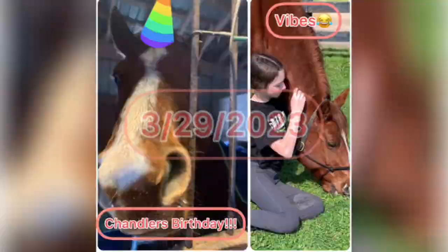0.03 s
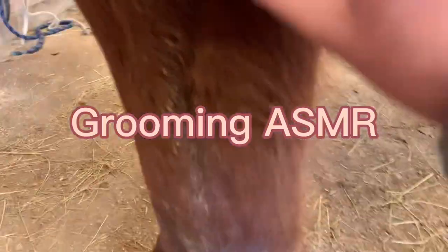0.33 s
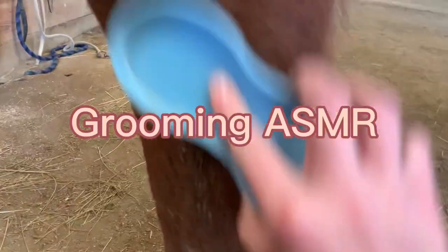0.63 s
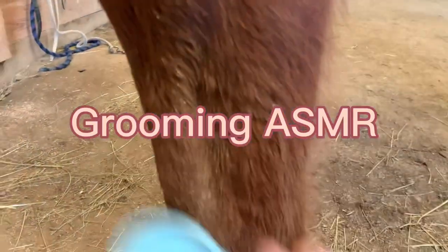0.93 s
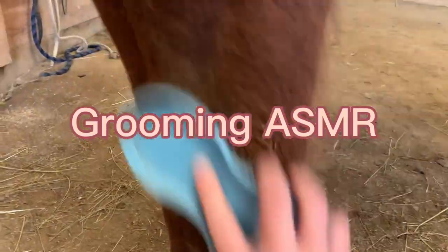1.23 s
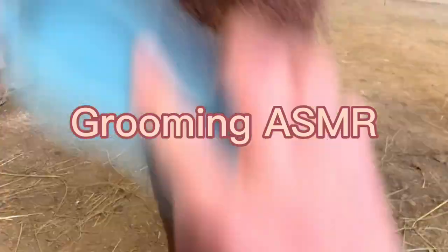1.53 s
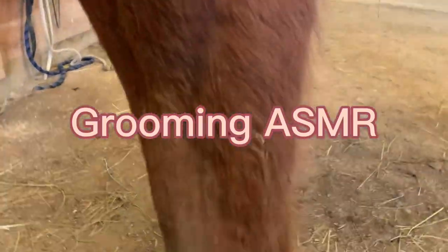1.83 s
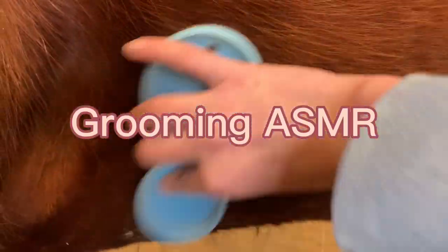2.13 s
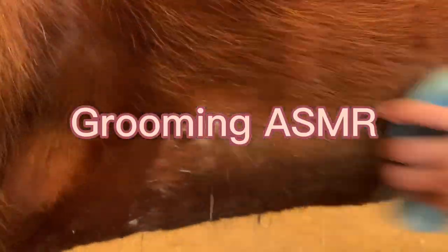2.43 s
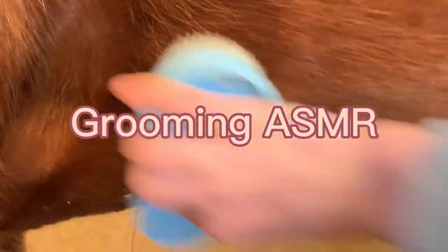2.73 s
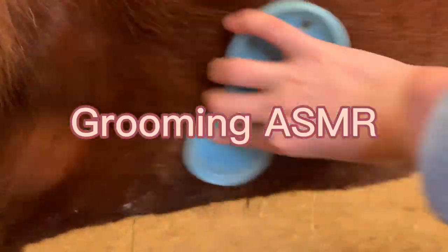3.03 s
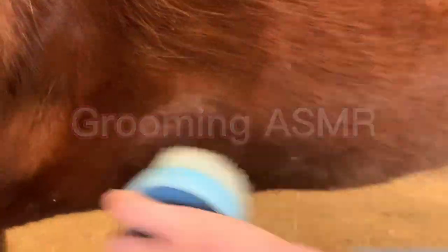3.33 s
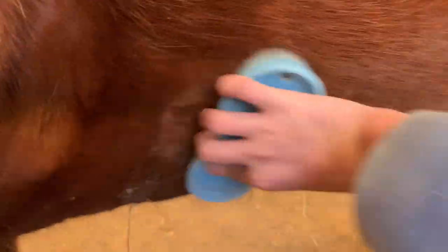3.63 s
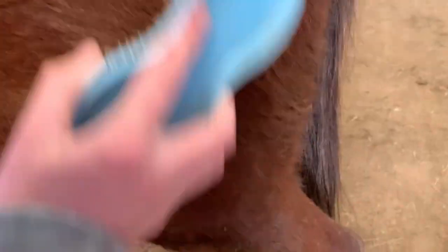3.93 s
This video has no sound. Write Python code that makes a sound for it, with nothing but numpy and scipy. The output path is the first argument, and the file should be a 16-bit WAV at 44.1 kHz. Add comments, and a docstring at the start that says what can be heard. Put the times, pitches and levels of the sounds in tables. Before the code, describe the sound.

A plastic bristle brush strokes a horse's coat: three scratchy swishes down a leg with soft thuds and ticks, then three slightly fuller ones on the flank. Heard from close by in a stable, over a low rumble.

```python
"""A plastic bristle brush sweeps a horse's coat in a stable: three strokes down a leg, three on the flank.
Friction excites countless flicks of bristle on hair, which superpose into a bright swish; hard
rubbing adds rasp and sizzle. Light impacts tick and thud, and the arm rustles between strokes.
A low rumble and a dull wash of air lie underneath. Two microphones hear it all from close by."""
import sys
import numpy as np
from scipy import signal
from scipy.fft import rfft, irfft
from scipy.io import wavfile
from scipy.ndimage import uniform_filter1d

SR = 44100
rng = np.random.default_rng(int(sys.argv[2]) if len(sys.argv) > 2 else 0)


def wrap_up_sound(samples):
    """Save the sound to the file named by the first command line argument, as 16-bit audio."""
    columns = np.atleast_2d(samples).T
    # keep every value between -1 and 1, then stretch to whole-number steps
    tamed = np.clip(columns, -1, 1)
    steps = np.round(tamed * 32767).astype(np.int16)
    wavfile.write(sys.argv[1], SR, steps)


N = 176400
TIME = np.arange(N) / SR

# Rubbing envelopes, one per stroke: t/s, level/dB
LEG_STROKES = [
    [(0.32, -66.5), (0.372, -48.5), (0.602, -39.5), (0.654, -33.5), (0.742, -39.5), (0.812, -37.5),
     (0.868, -45.5), (0.93, -74)],
    [(1.07, -71.5), (1.126, -39.5), (1.208, -34.5), (1.268, -39), (1.32, -37), (1.33, -37), (1.348, -62),
     (1.39, -75)],
    [(1.6, -75), (1.638, -44.5), (1.652, -41.5), (1.726, -36), (1.84, -41), (1.86, -64.5), (1.89, -65)],
]
# Bristles biting early in each stroke: centre t/s, half-width/s, level/dB
RASPS = [(.42, 0.17, -50), (.595, 0.084, -40), (1.155, 0.077, -39.5), (1.672, 0.061, -40)]
# Spectral densities of swish and rasp: f/Hz, relative level/dB
LEG_SPECTRUM = [(280,0), (480,-15.5), (1650,-10), (2000,-11.5), (2480,-5), (3050,-15.5), (3550,-10.5),
                (3950,-6), (5200,-9.5), (6200,-4.5), (8000,-1), (10000,-5), (15500,-4.5)]
RASP_SPECTRUM = [(600, -23.5), (1300, -21), (1800, -4.5), (2050, -11.5), (2550, 4), (3150, -3),
                 (3800, -0.5), (4700, -4.5), (5600, -7), (9000, -15), (16000, -26)]
# Stereo field at the leg: f/Hz, coherence (0-1), left phase lead/rad, left-right level/dB
LEG_STEREO = [(200,0.92,-1,2.5), (700,0.65,-0.76,-2), (1620,0.3,0,-6.5), (2860,.58,-2.8,0.5),
              (3250,0.8,0.5,-0.8), (4560,0,-4.5,6.5), (5600,0.3,-3.5,4), (6500,0,-2.1,1), (7700,1,-1.5,-2),
              (9700,0.73,-0.6,1)]
def leg_strokes(friction, swish_db=0.94, full_bite_db=-47):
    """Sliding friction: a thin swish follows the rubbing, with a rasp where the bristles bite."""
    rub = sum(map(envelope, LEG_STROKES))
    bite = np.minimum(rub / amp(full_bite_db), 1)
    swish = amp(swish_db) * rub * stereo(friction, LEG_SPECTRUM, LEG_STEREO)
    rasp = bite * swells(RASPS) * stereo(bristles(), RASP_SPECTRUM, LEG_STEREO)
    return swish + rasp


# Rubbing envelopes, one per stroke: t/s, level/dB
FLANK_STROKES = [
    [(2.19, -63), (2.216, -59.5), (2.274, -40.5), (2.352, -34), (2.428, -38.5), (2.458, -44.5),
     (2.48, -58.5), (2.53, -77)],
    [(2.85, -72), (2.948, -38), (3.104, -36), (3.196, -48.5), (3.222, -49), (3.242, -69), (3.27, -76.5)],
    [(3.45, -78), (3.562, -43.5), (3.676, -35), (3.768, -40), (3.806, -46), (3.82, -59), (3.852, -59.5),
     (3.86, -64)],
]
# Spectral density of the swish: f/Hz, relative level/dB
FLANK_SPECTRUM = [(250,-11), (500,-18.5), (1300,-11.5), (1550,-10.5), (1900,-4), (2450,-2.5), (2950,-7),
                  (3350,-4), (4600,-8), (6500,-2.5), (7400,-4.5), (8400,-1.5), (10000,-4.5), (15500,-6.5)]
# Low-treble boost or cut, one per stroke: level/dB
FLANK_BODY = [1, 2.5, -1]
# Stereo field at the flank: f/Hz, coherence (0-1), left phase lead/rad, left-right level/dB
FLANK_STEREO = [(200,0.7,0.7,3), (726,1,-0.75,-4), (1680,0.24,-4,-3.5), (2700,0.41,-2,-1),
                (3540,0.51,-2.5,1.5), (4900,0.45,-.5,6.5), (5540,0.8,-3,2), (6600,0.3,-2.5,2.5),
                (7440,1,-1.5,-1), (9700,0.64,-1,1)]
def flank_strokes(friction, swish_db=1.5, body_hz=2100, body_octaves=0.65):
    """Source and filter: friction noise takes a fuller spectrum on the flank, varied for each stroke."""
    hz, db = np.transpose(FLANK_SPECTRUM)
    body = np.exp(-(np.log2(hz / body_hz) / body_octaves) ** 2)
    out = np.zeros((2, N))
    for stroke, body_db in zip(FLANK_STROKES, FLANK_BODY):
        spectrum = np.column_stack([hz, db + body_db * body])
        out += envelope(stroke) * stereo(friction, spectrum, FLANK_STEREO)
    return amp(swish_db) * out


def bristles(flicks_per_s=12000, spread_db=2.8, chatter_db=0.69, chatter_hz=70):
    """Shot noise: random flicks of bristle tips add to the hiss of sliding hair at equal power."""
    sizes = amp(spread_db * np.minimum(rng.exponential(1, (2, N)), 5))
    signs = rng.choice([-1, 1], (2, N))
    flicks = sizes * signs * (rng.random((2, N)) < flicks_per_s / SR)
    hiss = rng.standard_normal((2, N))
    friction = np.sqrt(0.5) * (unit_rms(flicks) + hiss)
    return tufts(friction) * amp(chatter_db * wander(chatter_hz))


# Depth of the shifting resonances: f/Hz, rms level swing/dB
TUFT_DEPTH = [(800, 1.8), (2500, 3.0), (8000, 1.8), (15000, 1.4)]
def tufts(pair, frame=1024):
    """Random amplitude modulation: narrow bands swell and fade as different tufts take hold."""
    hz, _, bands = signal.stft(pair, SR, nperseg=frame)
    patches = uniform_filter1d(rng.standard_normal(bands.shape[1:]), size=5, axis=0)  # over frequency
    patches = uniform_filter1d(patches, size=12, axis=1)  # over time
    depth_db = at_frequencies(TUFT_DEPTH, hz)[0][:, None]
    return signal.istft(bands * amp(depth_db * unit_rms(patches)), nperseg=frame)[1][:, :N]


# Spectral density of the sizzle: f/Hz, relative level/dB
SIZZLE_SPECTRUM = [(3000, -29), (7000, -7), (11000, -8), (16000, -6.5)]
def sizzle(level_db=-31.5, reference_db=-33, exponent=1.7):
    """Power-law growth: with harder rubbing, a fine hiss rises faster than the swish."""
    rub = sum(map(envelope, LEG_STROKES + FLANK_STROKES))
    gain = amp(level_db) * (rub / amp(reference_db)) ** exponent
    return gain * stereo(bristles(), SIZZLE_SPECTRUM, LEG_STEREO)


# Grazes of the coat and rustles of the arm: centre t/s, half-width/s, level/dB
GRAZES = [(.21, 0.025, -56.5), (.30, 0.044, -67.5), (1.064, 0.0078, -59), (1.385, .03, -73),
          (1.585, .016, -61.5), (2.05, 0.095, -65), (2.154, 0.009, -48), (2.18, 0.059, -58),
          (3.98, .08, -70)]
RUSTLES = [(.12, 0.075, -67.5), (.23, 0.12, -62.5), (2.775, .025, -66.5), (2.87, 0.14, -65.5),
           (3.24, 0.072, -72), (3.49, 0.053, -55), (4.0, 0.032, -66)]
# Spectral density of the rustle: f/Hz, relative level/dB
RUSTLE_SPECTRUM = [(300, -19), (1500, 10.5), (2400, 4.5), (4500, -2.5), (8000, -12), (16000, -16)]
def touches(friction):
    """Light friction: bristles graze the coat and the arm rustles as the brush is brought back."""
    cloth = stereo(rng.standard_normal((2, N)), RUSTLE_SPECTRUM, ROOM_STEREO)
    coat = stereo(friction, LEG_SPECTRUM, LEG_STEREO)
    return swells(GRAZES) * coat + swells(RUSTLES) * cloth


# Light knocks of the brush: t/s, level/dB
TICKS = [(.263, -46), (.326, -46.5), (.616, -37), (.864, -43), (1.056, -51.5), (2.15, -43), (3.209, -45.5)]
# Spectral density of a knock: f/Hz, relative level/dB
TICK_SPECTRUM = [(150, -8), (800, 0), (2500, -3), (5000, -6), (9000, -12), (16000, -22)]
def ticks(decay_s=0.0025):
    """Impact transients: each knock is a broadband burst that decays exponentially, with no ring."""
    gain = sum(amp(db) * (TIME > s) * np.exp(-abs(TIME - s) / decay_s) for s, db in TICKS)
    return gain * stereo(rng.standard_normal((2, N)), TICK_SPECTRUM, ROOM_STEREO)


# Bumps of the brush against the leg: t/s, level/dB
BUMPS = [(0.359, -25.5), (1.192, -21), (1.265, -28)]
def bumps(hz=65, rise_s=0.0042, decay_s=0.022):
    """Damped oscillation: each bump excites a few cycles of a deep thud."""
    out = np.zeros(N)
    for onset, db in BUMPS:
        age = np.maximum(TIME - onset, 0)
        gain = amp(db) * (1 - np.exp(-age / rise_s)) * np.exp(-age / decay_s)
        out += gain * np.cos(2 * np.pi * hz * age)
    return out


# Background envelope, a little stronger down by the leg: t/s, level/dB
ROOM_LEVEL = [(0, -43.5), (1.6, -43.5), (2.0, -44), (4, -44.5)]
# Spectral density of the background: f/Hz, relative level/dB
ROOM_SPECTRUM = [(20,-22), (32,-14.5), (48,-1.5), (62,2.5), (85,-4), (105,-5.5), (150,-9), (210,-17),
                 (280,-20), (370,-28.5), (520,-32), (950,-26.5), (1500,-33.5), (2100,-38), (3200,-52.5),
                 (6000,-60), (16000,-60.5)]
# Stereo field of the stable: f/Hz, coherence (0-1), left phase lead/rad, left-right level/dB
ROOM_STEREO = [(60, 0.94, 0.015, 1.6), (265, 0.75, 0, 0.5), (685, 0.17, 0, -0.5), (1400, 0, 0, 1.5),
               (6000, .2, 0, 1.5)]
def stable(waver_db=0.6, waver_hz=9):
    """Ambient noise: energy concentrated in the bass gives a gently wavering rumble under dull air."""
    level_db = np.interp(TIME, *np.transpose(ROOM_LEVEL)) + waver_db * wander(waver_hz)
    return amp(level_db) * stereo(rng.standard_normal((2, N)), ROOM_SPECTRUM, ROOM_STEREO)


def stereo(pair, spectrum, field, mono_above_hz=10400):
    """Partial coherence: two noises are blended and filtered into left and right, at unit rms."""
    f = np.fft.rfftfreq(N, 1 / SR)
    common, separate = rfft(pair)
    coherence, lead, balance_db = at_frequencies(field, f)
    width = np.clip((mono_above_hz - f) / 500, 0, 1)
    coherence = 1 - width * (1 - np.clip(coherence, 0, 1))
    lead, balance_db = width * lead, width * balance_db
    blend = coherence * common + np.sqrt(1 - coherence ** 2) * separate
    left = common * amp(balance_db / 2)
    right = blend * np.exp(-1j * lead) * amp(-balance_db / 2)
    colour = amp(at_frequencies(spectrum, f)[0])
    return unit_rms(irfft(np.array([left, right]) * colour, N))


def envelope(stroke):
    """Amplitude envelope of a stroke: piecewise linear in decibels, zero outside it."""
    t, db = np.transpose(stroke)
    return amp(np.interp(TIME, t, db)) * (TIME > t[0]) * (TIME < t[-1])


def swells(rows):
    """Superposed Gaussian envelopes, each falling to 1/e at its half-width."""
    return sum(amp(db) * np.exp(-((TIME - centre) / half) ** 2) for centre, half, db in rows)


def wander(cutoff_hz):
    """Low-pass noise: a random fluctuation of unit rms."""
    f = np.fft.rfftfreq(N, 1 / SR)
    return unit_rms(irfft(rfft(rng.standard_normal(N)) / (1 + (f / cutoff_hz) ** 4), N))


def at_frequencies(table, hz):
    """Interpolation of each column on a logarithmic frequency axis."""
    f, *columns = np.transpose(table)
    return [np.interp(np.log(hz + 1), np.log(f + 1), column) for column in columns]


def amp(db):
    """Amplitude ratio of a level in decibels."""
    return 10 ** (np.asarray(db) / 20)


def unit_rms(x):
    """Normalisation to unit mean power."""
    return x / np.sqrt(np.mean(x ** 2) + 1e-20)


def scene():
    """Linear superposition: all sources add at the two microphones."""
    friction = bristles()
    brush = leg_strokes(friction) + flank_strokes(friction) + touches(friction) + sizzle()
    return brush + ticks() + bumps() + stable()


def record(dry, start_s=0.093, fade_s=0.015, low_cut_hz=34.5, high_cut_hz=15850):
    """Band limiting: the sound fades in after a brief silence and loses its deepest bass and top treble."""
    opened = dry * np.clip((TIME - start_s) / fade_s, 0, 1)
    highpass = signal.butter(3, low_cut_hz, "highpass", fs=SR, output="sos")
    lowpass = signal.firwin(511, high_cut_hz, window=("kaiser", 9), fs=SR)
    return signal.oaconvolve(signal.sosfiltfilt(highpass, opened), lowpass[None], "same")


dry = scene()
out = record(dry)
wrap_up_sound(out)
```